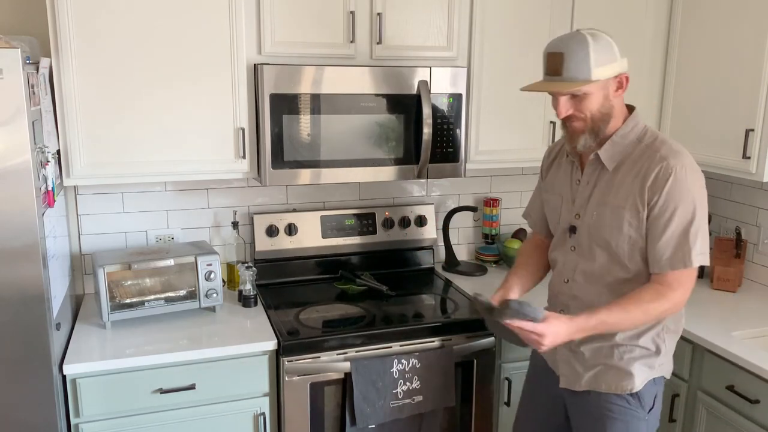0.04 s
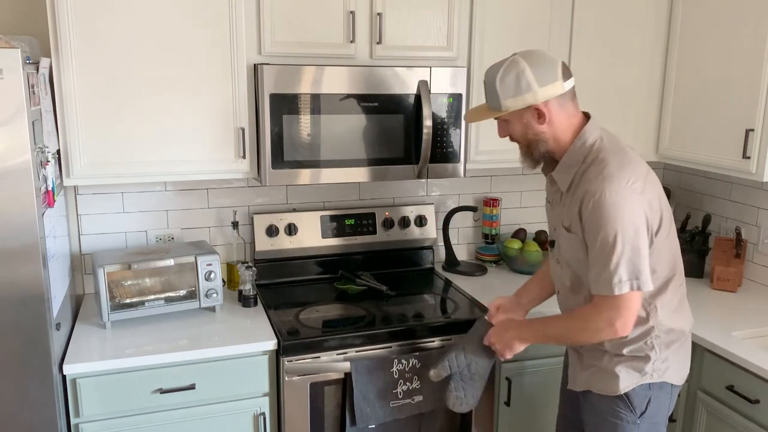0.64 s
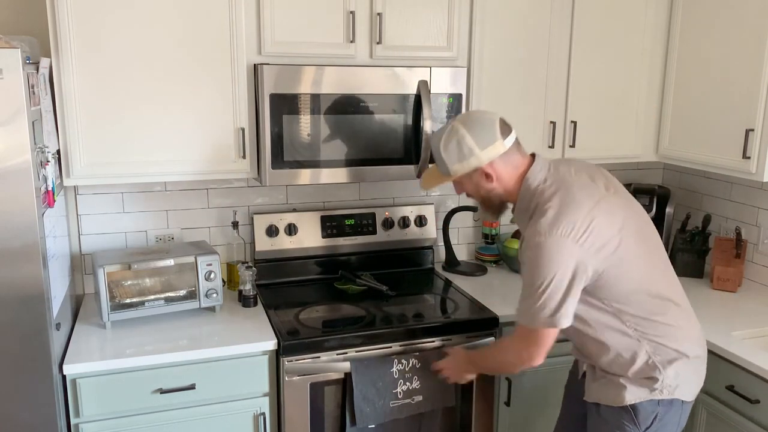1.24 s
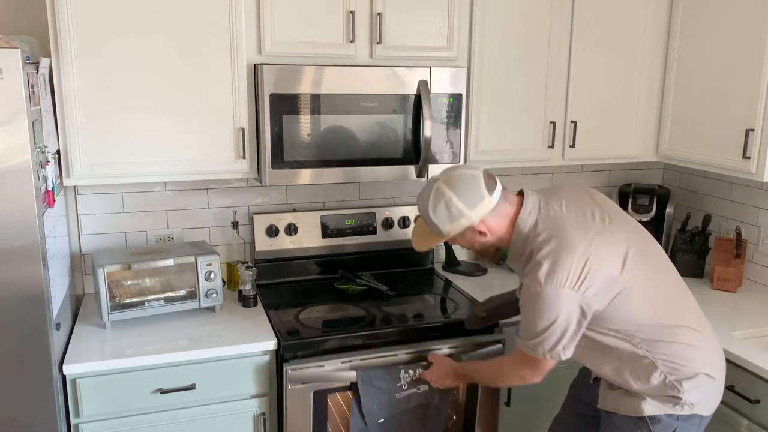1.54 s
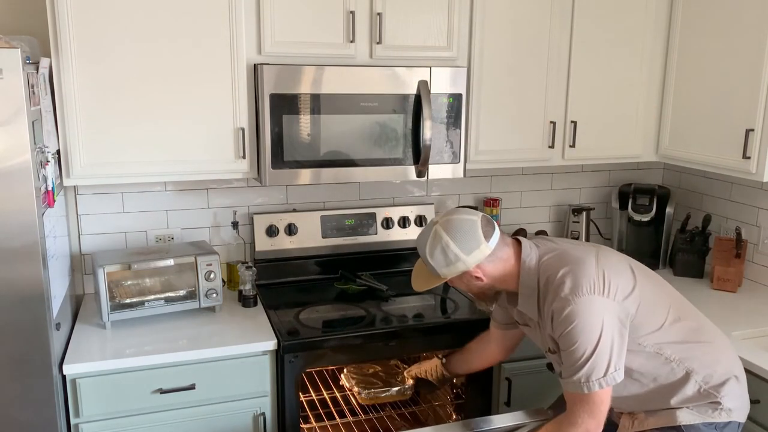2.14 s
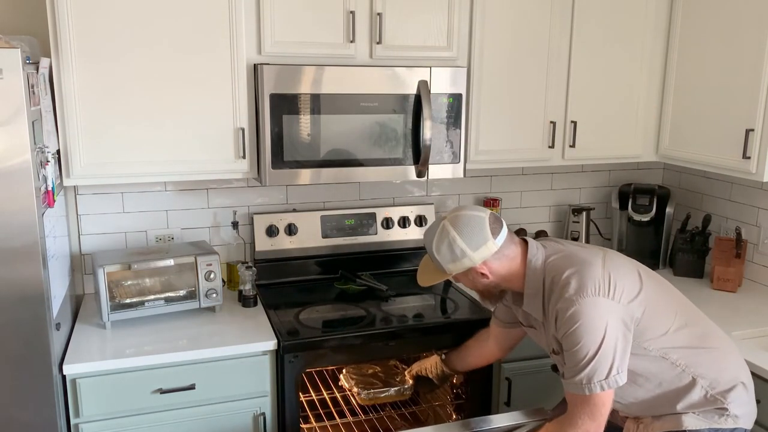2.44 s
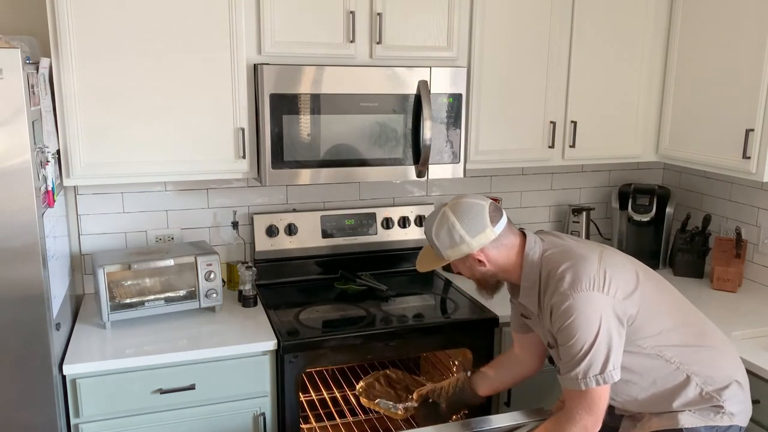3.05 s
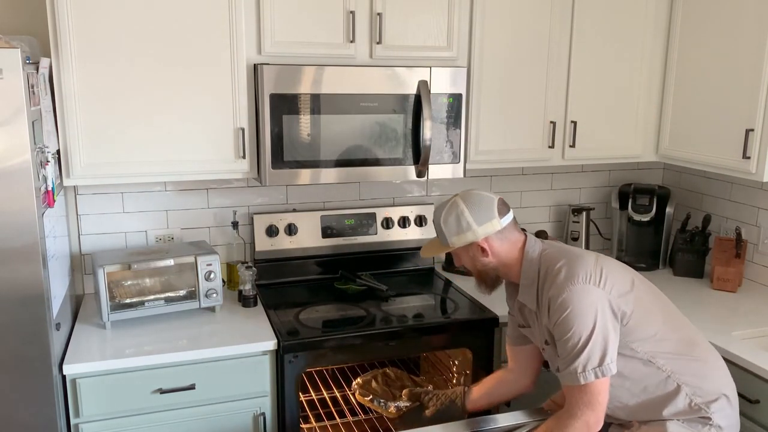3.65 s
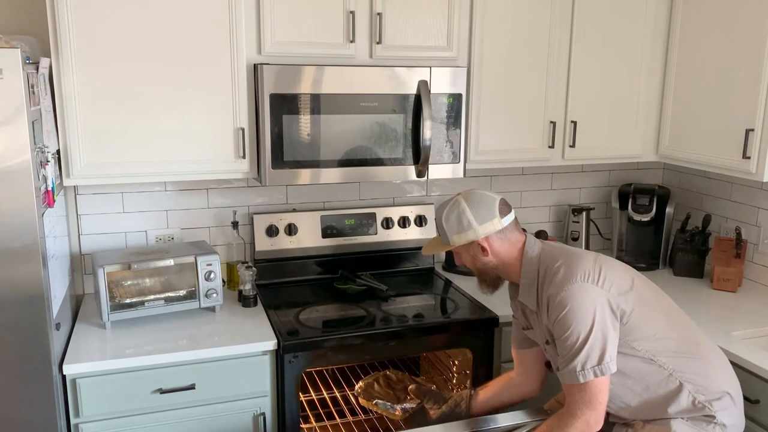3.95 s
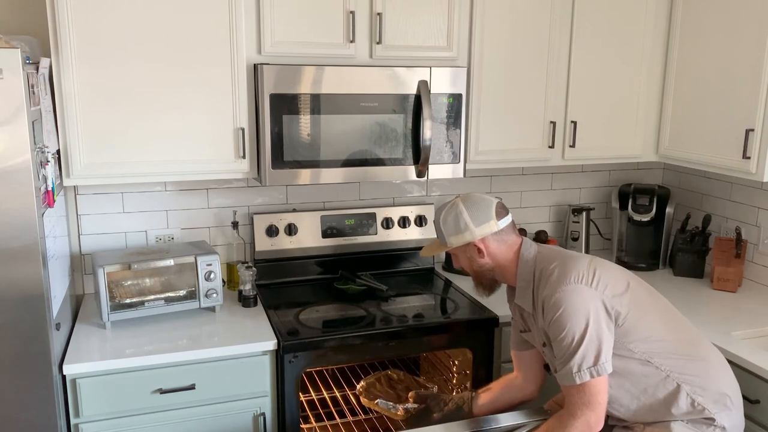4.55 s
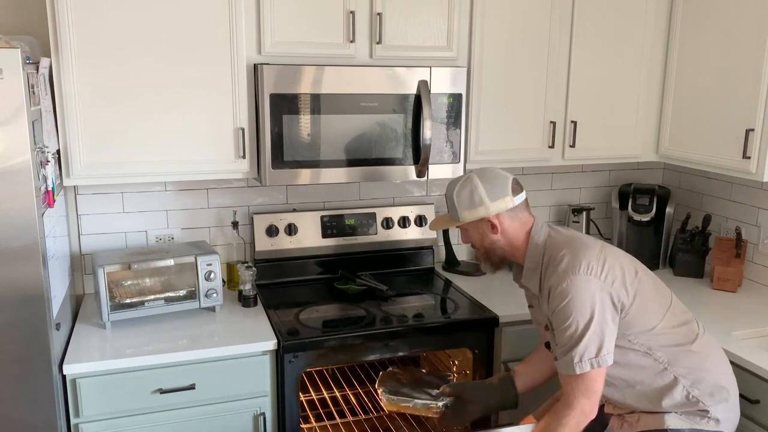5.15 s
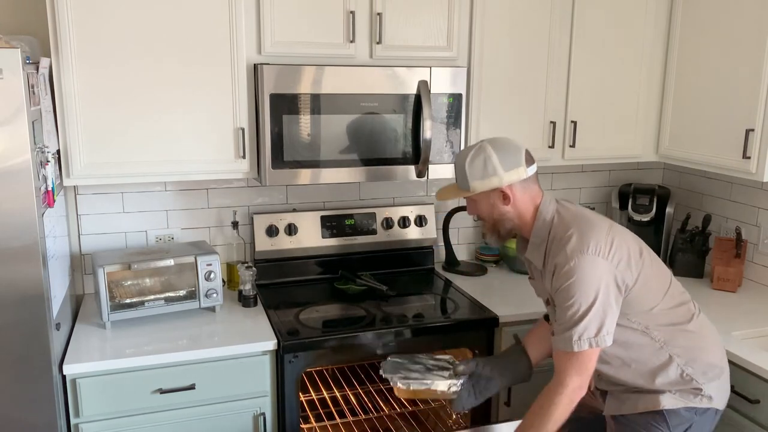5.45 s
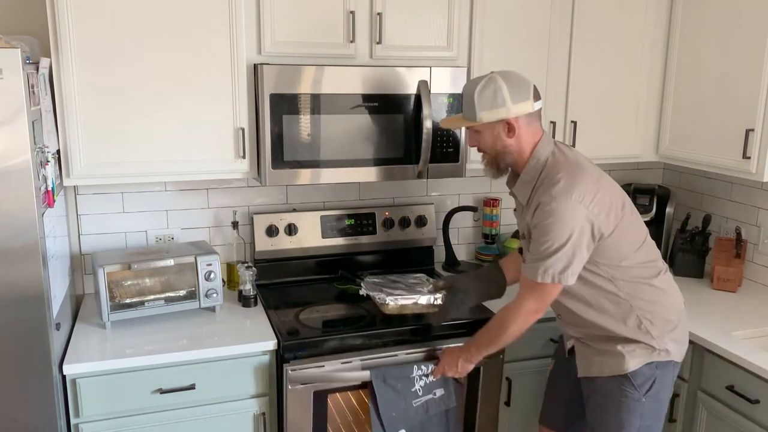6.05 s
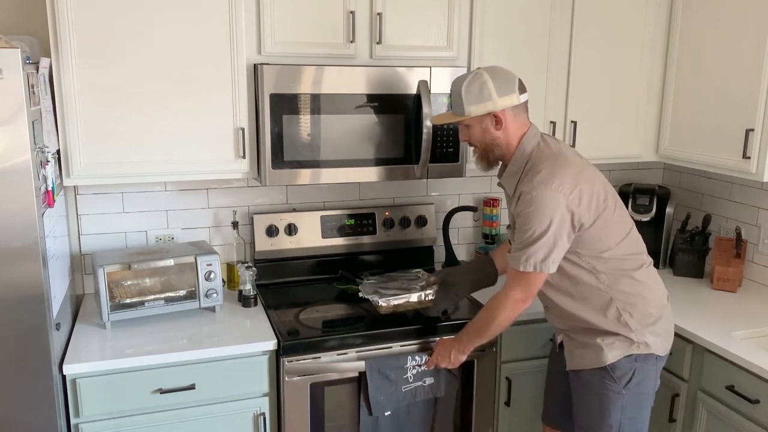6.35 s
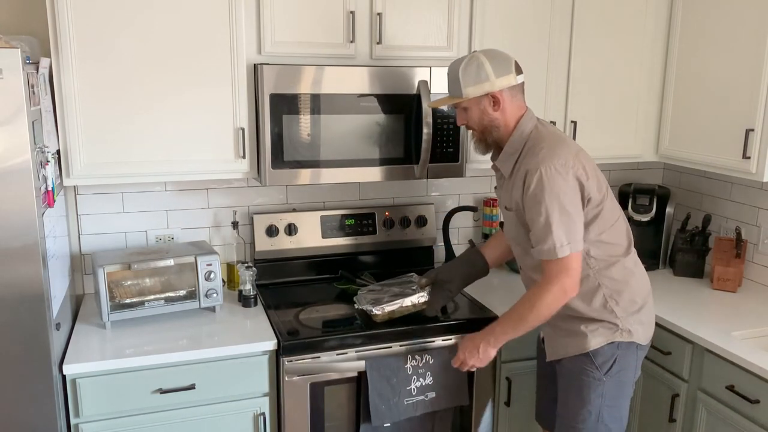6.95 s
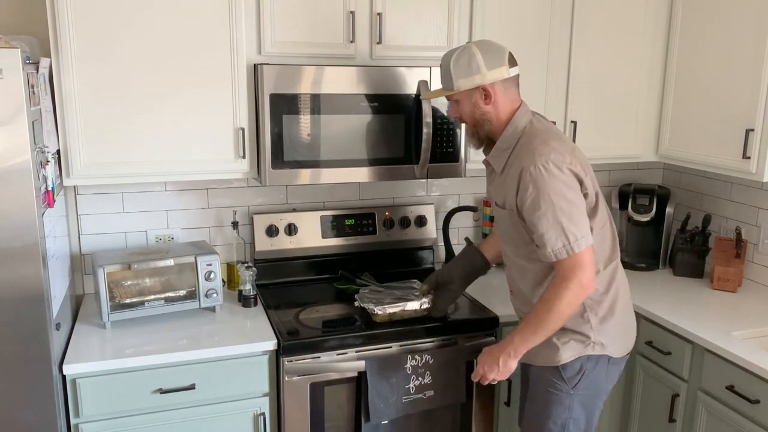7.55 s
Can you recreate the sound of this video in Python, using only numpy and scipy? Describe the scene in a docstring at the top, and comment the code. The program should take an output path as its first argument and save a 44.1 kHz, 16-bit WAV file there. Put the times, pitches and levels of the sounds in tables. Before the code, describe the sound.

A dish drags out along a ringing oven rack with crackling foil, lands on glass, and the oven door slams.

```python
"""In a small, humming kitchen a hand rubs into an oven mitt, and the oven door clicks and swings down.
A foil-covered dish is dragged over the wire rack with one long pull and a few short tugs: stick-slip
friction scrapes, the foil buckles, and catches excite the modes of the rack while the oven cavity drones.
The dish is lifted clear, knocks down on the glass cooktop and is eased along it.
Last, the door is pushed up, squeezes out a hiss of air and bangs shut, its panels ringing."""
import sys
import numpy as np
from scipy import signal
from scipy.io import wavfile

SR = 44100
rng = np.random.default_rng(int(sys.argv[2]) if len(sys.argv) > 2 else 0)


def inscribe(sig):
    """Save sig as 16-bit PCM at rate SR to the path in sys.argv[1].

    A 1-D sig is mono; a 2-D sig holds one channel per row.
    Samples are clipped to [-1, 1] before scaling.
    """
    pcm = np.round(np.clip(np.atleast_2d(sig).T, -1, 1) * 32767)
    wavfile.write(sys.argv[1], SR, pcm.astype(np.int16))


N = 344420
TIME = np.arange(N) / SR


def from_db(db):
    """Amplitude ratio of a level in decibels."""
    return 10 ** (np.asarray(db) / 20)


def rms_one(x):
    """Normalisation to rms 1."""
    return x / np.sqrt(np.mean(x ** 2) + 1e-20)


def unit_energy(x):
    """Normalisation to a sum of squares of 1."""
    return x / np.sqrt(np.sum(x ** 2) + 1e-20)


def at_hz(points, hz):
    """Interpolation on a logarithmic frequency axis."""
    freq, value = np.transpose(points)
    return np.interp(np.log(hz), np.log(freq), value)


def cut(x, hz, kind, order=2):
    """Butterworth filtering."""
    sections = signal.butter(order, np.minimum(hz, .48 * SR), kind, fs=SR, output="sos")
    return signal.sosfilt(sections, x + 1e-18)


def convolve(x, response):
    """Convolution: the output of a linear system with this impulse response."""
    return signal.oaconvolve(x, response)[:N]


def coloured(spectrum, source):
    """Spectral shaping: half-octave bands, each cut from its own source(hz); total energy 1."""
    edges = 20 * 2 ** (np.arange(21) / 2)
    out = 0
    for low, high in zip(edges, edges[1:]):
        hz = np.sqrt(low * high)
        band = unit_energy(cut(source(hz), [low, high], "band"))
        out = out + band * np.sqrt(high - low) * from_db(at_hz(spectrum, hz))
    return unit_energy(out)


def dying_noise(t60):
    """Exponential decay of countless overlapping modes, one second long."""
    return rng.standard_normal(SR) * from_db(-60 * TIME[:SR] / t60)


def body(spectrum, t60, damping, crack=0):
    """Dense impulse response: a contact crack, then decay in t60 at 1 kHz, faster in the treble."""
    contact = 1 + crack * np.exp(-TIME[:SR] / 0.0062)
    response = coloured(spectrum, lambda hz: contact * dying_noise(t60 * (hz / 1000) ** -damping))
    return response / np.sqrt(np.mean(response[:SR // 100] ** 2))


def ring(modes):
    """Free vibration: a sum of damped sinusoids."""
    t = TIME[:2 * SR]
    return sum(rng.choice([-1, 1]) * from_db(db - 60 * t / t60) * np.sin(2 * np.pi * hz * t)
               for hz, db, t60 in modes)


def resonate(x, peaks):
    """Forced vibration of parallel two-pole resonators."""
    out = 0
    for hz, width, db in peaks:
        r = np.exp(-np.pi * width / SR)
        poles = [1, -2 * r * np.cos(2 * np.pi * hz / SR), r * r]
        out = out + from_db(db) * (1 - r * r) / 2 * signal.lfilter([1, 0, -1], poles, x)
    return out


def clicks(rows, column=1):
    """Impulsive excitation: one impulse a row, at the level in the given column."""
    rows, out = np.array(rows), np.zeros(N)
    out[np.round(rows[:, 0] * SR).astype(int)] = from_db(rows[:, column])
    return out


def blows(rows, spectrum, t60, damping, crack, count=4):
    """Impacts on different spots of a body each excite a different mix of modes."""
    return sum(convolve(clicks(rows[k::count]), body(spectrum, t60, damping, crack))
               for k in range(min(count, len(rows))))


def grains(per_s, spread_db):
    """Shot noise: random impulses of uneven size, with the same power at any rate."""
    sizes = from_db(spread_db * np.minimum(rng.exponential(1, N), 4)) * rng.choice([-1, 1], N)
    return rms_one(sizes * (rng.random(N) < per_s / SR) / np.sqrt(per_s))


def swells(rows):
    """Amplitude envelope: one bell-shaped rise and fall for each movement."""
    return sum(from_db(db) / np.cosh(np.clip(1.4 * (TIME - middle) / width, -30, 30))
               for middle, width, db in rows)


# appliance noise: (frequency [Hz], relative density [dB])
HUSH_SPECTRUM = [(12, -30), (20, 5), (189, 1), (357, 1.5), (484, -6), (693, -6.5), (796, -10),
                 (1640, -24.5), (3550, -28), (5690, -31.5), (12700, -35), (15000, -61)]
def appliance_hush(level_db=-56.5):
    """Stationary noise from the appliances, strongest in the bass."""
    return from_db(level_db) * rms_one(coloured(HUSH_SPECTRUM, lambda hz: rng.standard_normal(N)))


# reverberation time: (frequency [Hz], T60 [s])
KITCHEN_T60 = [(100, 0.74), (300, 0.47), (1500, 0.98), (5000, 0.57), (13000, 0.43)]
# reverberant field: (frequency [Hz], relative density [dB])
KITCHEN_SPECTRUM = [(40, 21), (200, 4.5), (1500, 1.5), (14000, -11)]
def kitchen(x, spectrum=KITCHEN_SPECTRUM, first_echo_s=0.0014, build_s=0.0024):
    """Reverberation: reflections from hard cupboards and tiles merge into a short diffuse tail."""
    tail = coloured(spectrum, lambda hz: dying_noise(at_hz(KITCHEN_T60, hz)))
    onset = np.clip((TIME[:SR] - first_echo_s) / build_s, 0, 1)
    return convolve(x, unit_energy(tail * onset))


def echo(rows, spectrum, db):
    """Diffuse field: a blow radiates all round, so the room returns only its broad spectrum."""
    return from_db(db) * kitchen(clicks(rows), spectrum)


# the dish's move along the cooktop: centre time, half width
SHOVE_S, SHOVE_HALF_S = 7.35, 0.23
def shove(band_hz=(513, 1880), level_db=-65):
    """Sliding friction of the dish on glass gives a soft band of noise."""
    rub = rms_one(cut(rng.standard_normal(N), band_hz, "band"))
    return rub * swells([(SHOVE_S, SHOVE_HALF_S, level_db)])


# rubbing fabric: (frequency [Hz], relative density [dB])
CLOTH_SPECTRUM = [(350, -43), (700, -13.5), (1160, -15), (1650, -9.5), (2680, -19.5), (4460, -15.5),
                  (7750, -19.5), (12600, -21), (15000, -69)]
# movements of mitt and clothes: (centre time [s], half width [s], level [dB])
SWISHES = [(.43, 0.046, -58.5), (.615, 0.019, -58.5), (.77, 0.05, -73.5), (.945, 0.044, -53),
           (1.005, 0.013, -56), (1.133, 0.0076, -56.5), (1.33, 0.029, -57), (1.5, 0.74, -64.5),
           (2.15, 0.05, -62.5), (2.42, 0.02, -55)]
def cloth(shove_db=-67):
    """Friction between countless fibres of mitt and shirt sums to a fluttering noise."""
    rub = coloured(CLOTH_SPECTRUM, lambda hz: rng.standard_normal(N))
    weave = from_db(1.35 * rms_one(cut(rng.standard_normal(N), 130, "low")))
    return rms_one(rub) * weave * swells(SWISHES + [(SHOVE_S, SHOVE_HALF_S, shove_db)])


# cavity of the mitt: (frequency [Hz], bandwidth [Hz], gain [dB])
MITT_HOLLOW = [(900, 120, 7), (1700, 470, 5), (2230, 280, 2.5), (3580, 910, 3.5), (5300, 1100, 3.5),
               (11900, 4700, -2)]
def mitt(start_db=-53, fade_db_per_s=38):
    """Cavity resonance colours the rub of the lining, which fades as the hand comes to rest."""
    rub = 0
    for hz, width, db in MITT_HOLLOW:
        band = resonate(rng.standard_normal(N), [(hz, width, db)])
        rub = rub + resonate(band, [(hz, 2 * width, 0)])
    return rms_one(rub) * from_db(start_db - fade_db_per_s * TIME)


# slips of the mitt, later of the dish on glass:
# (time [s], duration [s], start frequency [Hz], end frequency [Hz], level [dB])
SQUEAKS = [(0.002, 0.06, 900, 873, -58.5), (0.936, 0.0298, 1420, 1860, -44),
           (1.25, 0.066, 2970, 3130, -61.5), (1.268, 0.041, 4140, 4100, -52),
           (1.348, 0.041, 4800, 4240, -52), (7.411, 0.039, 757, 680, -56)]
def squeaks(waver=0.06):
    """Stick-slip oscillation gives short, raspy glides."""
    out = np.zeros(N)
    wobble = 1 + waver * rms_one(cut(rng.standard_normal(N), 693, "low"))
    for start, length, from_hz, to_hz, db in SQUEAKS:
        progress = np.clip((TIME - start) / length, 0, 1)
        pitch = (from_hz + (to_hz - from_hz) * progress) * wobble
        envelope = from_db(db) * np.sqrt(2 * np.sin(np.pi * progress))
        out += envelope * np.sin(2 * np.pi * np.cumsum(pitch) / SR)
    return out


# the mitt meets the door handle: (time [s], relative level [dB])
PATS = [(1.006, -47), (1.153, -45.5)]
# handle modes: (frequency [Hz], gain [dB], T60 [s])
HANDLE_MODES = [(236, -8, 0.05), (625, 4, 0.022)]
def pats():
    """Padded impacts excite the heavily damped modes of the handle."""
    return convolve(clicks(PATS), ring(HANDLE_MODES))


# clicks of the door's catch and handle, and late ticks of foil as the hand lets go of the dish:
# (time [s], relative level [dB])
SNAPS = [(1.252, -74), (1.462, -57), (1.561, -42), (6.04, -62), (6.3243, -39.5), (7.546, -62),
         (7.62, -57.5), (7.688, -63)]
# one click: (frequency [Hz], relative density [dB])
SNAP_SPECTRUM = [(100, -45), (217, 5), (391, 4.5), (780, -0.5), (1460, -0.5), (1840, 3), (2050, 2),
                 (2860, -1.5), (3610, -5.5), (4540, -8), (6760, -8), (13500, -9.5), (15000, -27)]
# bright ring of the clicks: (frequency [Hz], bandwidth [Hz], gain [dB])
SNAP_PEAKS = [(3660, 360, 7.5), (4240, 120, 6.5)]
# bumps of feet and of the door at its stop: (time [s], relative level [dB])
BUMPS = [(0.999, -56), (1.572, -50.5), (1.726, -46), (2.385, -58.5), (6.04, -46.5)]
# one bump: (frequency [Hz], relative density [dB])
BUMP_SPECTRUM = [(18, -28), (30, -2.5), (60, -6), (171, -10), (376, -8.5), (540, -16.5), (1080, -28),
                 (2000, -29), (12000, -61)]
# door movements: (centre time [s], half width [s], relative level [dB])
SWINGS = [(1.82, 0.11, -41), (6.09, 0.056, -40.5), (6.46, 0.15, -41.5)]
def door_swing():
    """Structure-borne sound: the catch snaps, the door rumbles and bumps its stop; later, foil ticks."""
    snaps = blows(SNAPS, SNAP_SPECTRUM, t60=0.22, damping=0.46, crack=0.12)
    snaps = snaps + echo(SNAPS, SNAP_SPECTRUM, db=19.5)
    bright_snaps = snaps + resonate(snaps, SNAP_PEAKS)
    bumps = blows(BUMPS, BUMP_SPECTRUM, t60=0.72, damping=0.041, crack=1.0)
    rumble = rms_one(cut(rng.standard_normal(N), [27, 95], "band")) * swells(SWINGS)
    return from_db(4.0) * bright_snaps + from_db(2.5) * bumps + from_db(-11.5) * rumble


# the dish meets the cooktop: (time [s], relative level [dB])
LANDING_BLOWS = [(6.8193, -15), (6.8325, -35)]
# the knock: (frequency [Hz], relative density [dB])
LANDING_SPECTRUM = [(24, -41), (40, -16.5), (313, -3), (765, -10), (1080, -9.5), (1520, -16.5), (3300, -15),
                    (4300, -21.5), (6620, -29.5), (13300, -42.5), (15000, -59)]
# glass plate modes: (frequency [Hz], gain [dB], T60 [s])
COOKTOP_MODES = [(156, 8.5, 0.14), (237.5, -9, 0.57), (316, 10, 0.12), (546, -14, 0.4), (1294, 2, 0.14)]
def landing():
    """The impact of the dish sets the glass plate into brief free vibration."""
    knock = blows(LANDING_BLOWS, LANDING_SPECTRUM, t60=0.14, damping=0.034, crack=3.7)
    room = echo(LANDING_BLOWS, LANDING_SPECTRUM, db=16.5)
    glass = convolve(clicks(LANDING_BLOWS), ring(COOKTOP_MODES))
    return from_db(-2.5) * (knock + room) + from_db(-14.5) * glass


# the door meets the frame, seats and rebounds: (time [s], relative level [dB])
SLAM_BLOWS = [(7.7067, -12.5), (7.7085, -6), (7.7193, -13), (7.724, -20)]
# the clatter: (frequency [Hz], relative density [dB])
SLAM_SPECTRUM = [(30, -30), (110, -8.5), (340, -6.5), (760, -11), (1060, -6.5), (1400, -10.5),
                 (2150, -18.5), (3000, -14), (4300, -18.5), (5880, -28), (8470, -26), (15000, -38)]
# door panel modes: (frequency [Hz], gain [dB], T60 [s])
DOOR_MODES = [(118, -6, 0.15), (148, 5, 0.18), (267, 7, 0.081), (516, -2, 0.17), (697, 1.5, 0.12),
              (1178, -12, 0.23), (1300, 6.5, 0.096), (2810, -20, 0.14), (7220, -9, 0.14)]
def slam():
    """Repeated impacts clatter on the frame; the seating blow excites the room and the panel modes."""
    seating = SLAM_BLOWS[1:2]
    clatter = blows(SLAM_BLOWS, SLAM_SPECTRUM, t60=0.066, damping=0.12, crack=1.6)
    room = echo(seating, SLAM_SPECTRUM, db=18.0)
    panels = convolve(clicks(seating), ring(DOOR_MODES))
    return clatter + room + from_db(-9.0) * panels


def air_rush(contact_db=-34, rise_db_per_s=312):
    """Flow noise grows in the narrowing gap until the door meets the frame."""
    time_left = SLAM_BLOWS[0][0] - TIME
    hiss = rms_one(cut(rng.standard_normal(N), [600, 7000], "band", order=1))
    return from_db(contact_db - rise_db_per_s * np.abs(time_left)) * (time_left > 0) * hiss


# pulls on the dish: (time at full speed [s], run-up [s], friction level [dB], crackle level [dB])
TUGS = [(2.29, 0.32, -51.5, -66), (2.837, 0.36, -23, -40), (3.81, 0.14, -33.5, -52.5),
        (4.03, 0.091, -37.5, -56), (4.268, 0.14, -37.5, -76), (4.73, 0.054, -49.5, -84)]
def tugging(column=2, exponent=1, hold_share=0.17, coast_db_per_s=50.5):
    """Envelope of friction or crackle: each tug gathers speed, holds it briefly and coasts out."""
    out = 0
    for tug in TUGS:
        s, run_up = tug[:2]
        attack = np.clip(1 + (TIME - s) / run_up, 0, 1) ** 2
        release = from_db(-coast_db_per_s * np.maximum(TIME - s - hold_share * run_up, 0))
        out = np.maximum(out, from_db(tug[column]) * (attack * release) ** exponent)
    return out


# oven cavity resonances: (frequency [Hz], bandwidth [Hz], gain [dB])
OVEN_PEAKS = [(287.7, 8, 10), (326.7, 15.3, 7.5), (430, 12, -20)]
def oven_cavity(loudest_db=-45.5, exponent=0.51, lag_s=0.31):
    """Cavity resonance stores energy from the rack's jolts, so its drone lags behind the tugs."""
    stored = signal.lfilter([1], [1, -np.exp(-1 / (lag_s * SR))], tugging() ** (2 * exponent))
    drone = rms_one(resonate(grains(per_s=45, spread_db=1), OVEN_PEAKS))
    return from_db(loudest_db) * np.sqrt(stored / stored.max()) * drone


# the dish is gripped, bumps over wires and is lifted out: (time [s], relative level [dB])
THUMPS = [(2.199, -39), (3.945, -47), (4.007, -41), (4.134, -38.5), (4.372, -58), (4.512, -49.5),
          (5.491, -47)]
# modes of the dish's bottom: (frequency [Hz], gain [dB], T60 [s])
BOTTOM_MODES = [(343.7, 1.5, 0.15), (563, 2, 0.06)]
def dish_thumps(coupling_db=33):
    """Impacts ring the dish's bottom and, by coupling, the oven cavity."""
    impacts = clicks(THUMPS)
    return convolve(impacts, ring(BOTTOM_MODES)) + from_db(coupling_db) * resonate(impacts, OVEN_PEAKS)


# the dish catches on wires, then taps the oven's mouth on the way out:
# (time [s], relative knock level [dB], relative crackle level [dB])
CONTACTS = [(2.198, -30.5, -34), (2.297, -44, -46), (2.534, -47.5, -51), (2.831, -16, -32),
            (2.889, -15.5, -32), (2.935, -15, -34), (3.084, -19.5, -42), (3.156, -30, -43),
            (3.25, -21, -34.5), (3.337, -28.5, -48), (3.47, -34, -52), (3.545, -45, -45),
            (3.606, -46.5, -57), (3.686, -44.5, -51), (3.726, -36, -53), (3.768, -44, -32.5),
            (3.804, -30, -37.5), (3.927, -29, -60), (3.955, -42, -40), (4.006, -27, -38.5),
            (4.031, -32.5, -47), (4.223, -39, -42), (4.236, -24, -37), (4.344, -34.5, -64),
            (4.399, -34, -33), (4.512, -40, -51), (4.656, -36, -49), (4.711, -30.5, -50),
            (4.777, -55, -46.5), (4.951, -40, -65), (5.08, -53, -75), (5.491, -41, -77)]
# one contact: (frequency [Hz], relative density [dB])
CONTACT_SPECTRUM = [(88, -22), (150, 0.5), (350, 0), (787, -2.5), (1380, -2), (2100, 5), (2360, -10.5),
                    (2650, 0), (4370, -6.5), (12100, -7.5), (15000, -15)]
def dish_knocks():
    """Each contact is an impact whose dense ring is damped fastest in the treble."""
    knocks = blows(CONTACTS, CONTACT_SPECTRUM, t60=0.56, damping=0.83, crack=0, count=7)
    return from_db(-7.0) * cut(knocks, 5330, "low", order=4)


RIM_TOUCHES_S = 3.65   # from here on the foil rim touches the wires
def foil(snap_db=19, burst_t60=0.15, late_db=-4.5, count=4):
    """Buckling: creases snap under the drag and in a burst at each contact, each with a bright ring."""
    snaps = clicks(CONTACTS, column=2)
    bursts = signal.lfilter([1], [1, -from_db(-60 / (burst_t60 * SR))], snaps)
    strain = from_db(3.5) * tugging(column=3, exponent=1.55) + .5 * bursts
    creases = grains(per_s=590, spread_db=2.5) * strain + from_db(snap_db) * snaps
    creases = creases * from_db(late_db * (TIME > RIM_TOUCHES_S))
    spot = (TIME / 0.048).astype(int) % count
    rings = [cut(dying_noise(t60=0.07), [5500, 13800], "band", order=3) for _ in range(count)]
    return sum(convolve(creases * (spot == k), unit_energy(rings[k])) for k in range(count))


# clusters of high modes of single wires: (frequency [Hz], relative level [dB])
WIRE_CLUSTERS = [(2880, 11.5), (3165, 2), (3760, 3), (5060, -4), (5870, 4), (6830, 2), (8640, 1),
                 (11000, 0.5), (13150, -2), (13800, -7)]
def wire_jingle(detune=.011, uneven_db=4.5, t60=0.22, pluck_db=-7, chatter_db=-2, count=4):
    """Plucked bars: the foil rim flicks and chatters over wires, each tuned a little differently."""
    plucks = [row for row in CONTACTS if row[0] > RIM_TOUCHES_S]
    chatter = grains(per_s=40, spread_db=8) * tugging(column=3) * (TIME > RIM_TOUCHES_S)
    out = 0
    for k in range(count):
        modes = [(hz * (1 + detune * rng.standard_normal()), db + uneven_db * rng.standard_normal(), t60)
                 for hz, db in WIRE_CLUSTERS for _ in range(3)]
        wire = ring(modes)[:SR]
        wire = wire / np.std(wire[:SR // 100])
        touching = (TIME * 10).astype(int) % count == k
        out = out + from_db(pluck_db) * convolve(clicks(plucks[k::count], column=2), wire)
        out = out + from_db(chatter_db) * convolve(chatter * touching, unit_energy(wire))
    return out


LIFTED_S = 5.14   # the dish leaves the rack
# mode of the last wire: (frequency [Hz], level [dB], T60 [s])
LAST_WIRE_MODE = [(4840, -74.5, 1.9)]
def lift_off():
    """Sudden release leaves the last wire in thin, lightly damped vibration."""
    return convolve(clicks([(LIFTED_S, 0)]), ring(LAST_WIRE_MODE))


def wire_freedom(s, hz, free_db=-9, mute_db_per_s=9, at_edge_s=4.84):
    """Loading, in dB: the dish's weight mutes low modes most, and less as it nears the edge."""
    slope = mute_db_per_s * (1000 / hz) ** .4
    return np.where(s < LIFTED_S, free_db - slope * np.maximum(at_edge_s - s, 0), -np.inf)


# modes of the whole rack: (frequency [Hz], gain [dB], T60 [s])
RACK_MODES = [(667, -15, 1), (695, -10.5, 1.05), (900, -14, 0.67), (1195, -14, 0.83), (1516, -12, 0.82),
              (1600, -10.5, 0.65), (1873, -4, 0.25), (3640, -25, 1.6), (11000, -25.5, 0.61),
              (13150, -27, 0.504)]
def rack_ring(spread_db=1.5, detune=0.01224):
    """Modal superposition: catches pluck every mode, slightly mistuned by the dish's weight."""
    out, t = np.zeros(N + SR), TIME[:SR]
    for s, peak, _ in CONTACTS:
        start = int(s * SR)
        scatter = rng.standard_normal((len(RACK_MODES), 2))
        for (hz, db, t60), (strength, pitch) in zip(RACK_MODES, scatter):
            level = peak + db + wire_freedom(s, hz) + spread_db * strength
            tone = np.sin(2 * np.pi * hz * (1 + detune * pitch) * t)
            out[start:start + SR] += from_db(level - 60 * t / t60) * tone
    return out[:N]


# response of the dish to a slip: (frequency [Hz], relative density [dB])
SCRAPE_SPECTRUM = [(55, -42), (100, -0.5), (423, 4.5), (461, -13), (684, 5), (815, -10.5), (950, -21),
                   (1080, -2), (1210, 5), (1720, -12), (2090, -4.5), (3540, -5), (12000, -20.5),
                   (15000, -0.5)]
# dish resonances: (frequency [Hz], bandwidth [Hz], gain [dB])
DISH_PEAKS = [(1215, 3.3, 8), (1564, 41, 1.5), (2056, 180, -1), (2800, 340, -9), (3900, 36, -9.5),
              (5100, 170, -3.5)]
def sliding_scrape(slow_per_s=1400, extra_per_s=3000, count=3):
    """Stick-slip friction shakes the dish; the harder the pull, the denser and louder the slips."""
    friction = tugging()
    slips = grains(slow_per_s + extra_per_s * friction / friction.max(), spread_db=5.5) * friction
    spot = (TIME / .07).astype(int) % count   # the contact wanders from wire to wire
    rings = [body(SCRAPE_SPECTRUM, t60=0.14, damping=0.38, crack=0.5) for _ in range(count)]
    shaken = sum(convolve(slips * (spot == k), unit_energy(rings[k])) for k in range(count))
    grit = cut(shaken, 9250, "low", order=4)
    return from_db(-2.5) * grit + from_db(4.5) * resonate(shaken, DISH_PEAKS)


def dish_on_rack():
    """Friction and impacts drive the dish, its foil and the rack together."""
    impacts = dish_knocks() + dish_thumps()
    return impacts + sliding_scrape() + foil() + rack_ring() + wire_jingle() + lift_off()


def scene():
    """Superposition of direct sound, reverberation and the steady hush, in one channel."""
    handling = mitt() + cloth() + squeaks() + pats()
    handling = handling + dish_on_rack() + oven_cavity() + shove() + air_rush()
    hush = appliance_hush()
    room = from_db(-14.5) * kitchen(handling)
    return (handling + room + door_swing() + landing() + slam() + hush)[None]


def record(dry, ceiling=0.54, cutoff_hz=14900):
    """Soft saturation flattens the loudest peaks; a steep low-pass limits the bandwidth."""
    rounded = dry / (1 + (dry / ceiling) ** 6) ** (1 / 6)
    return signal.sosfilt(signal.ellip(10, .2, 80, cutoff_hz, fs=SR, output="sos"), rounded)


dry = scene()
out = record(dry)
inscribe(out)
```